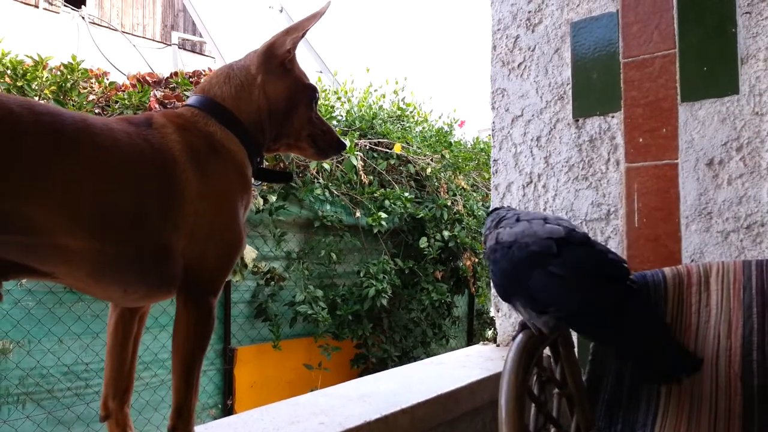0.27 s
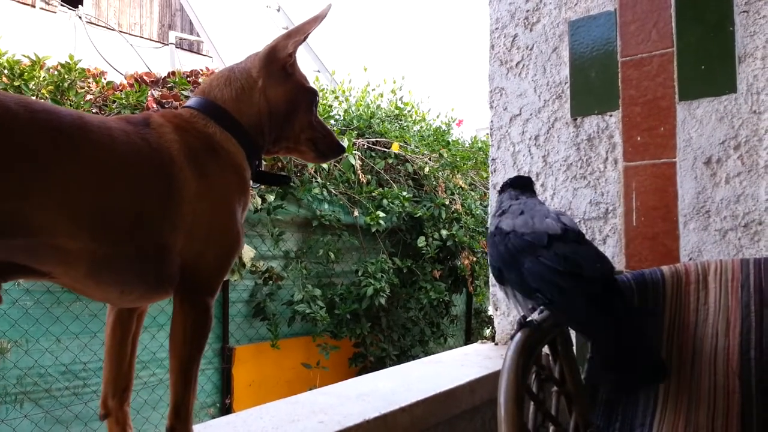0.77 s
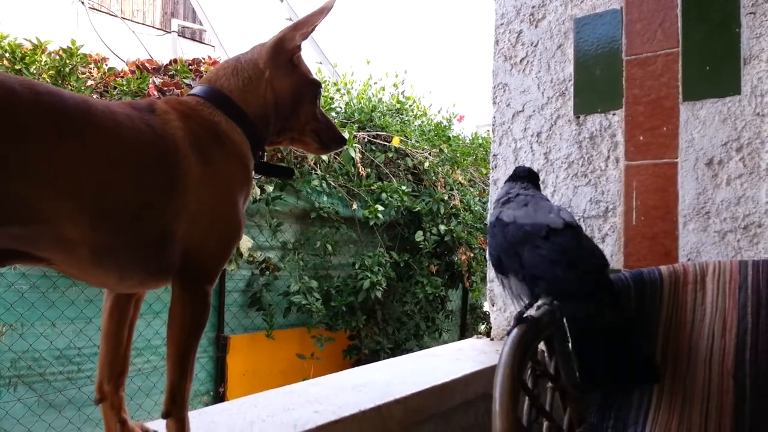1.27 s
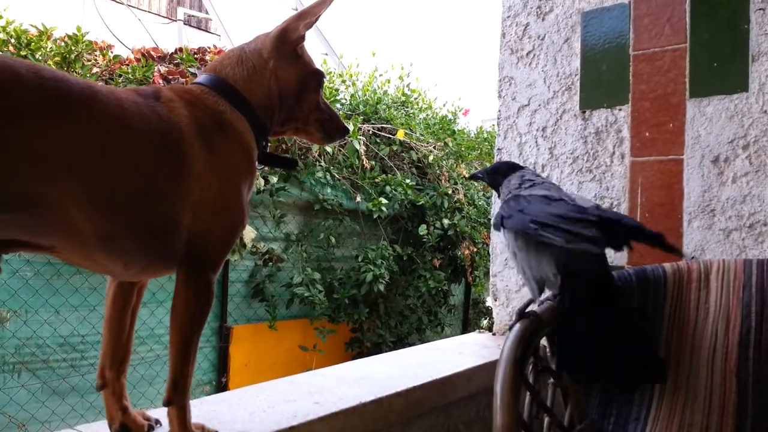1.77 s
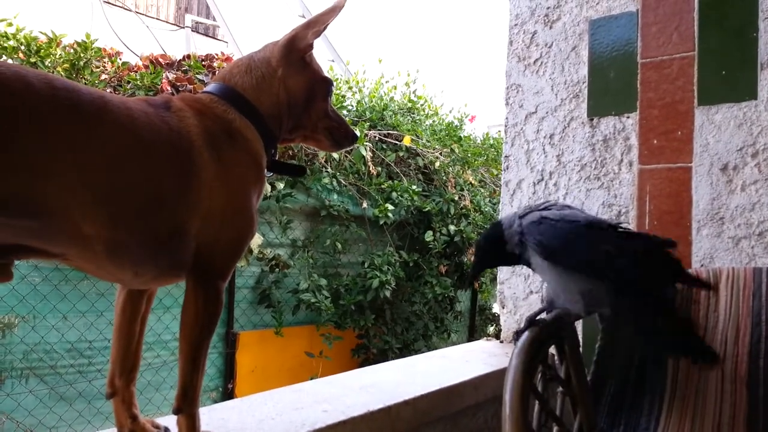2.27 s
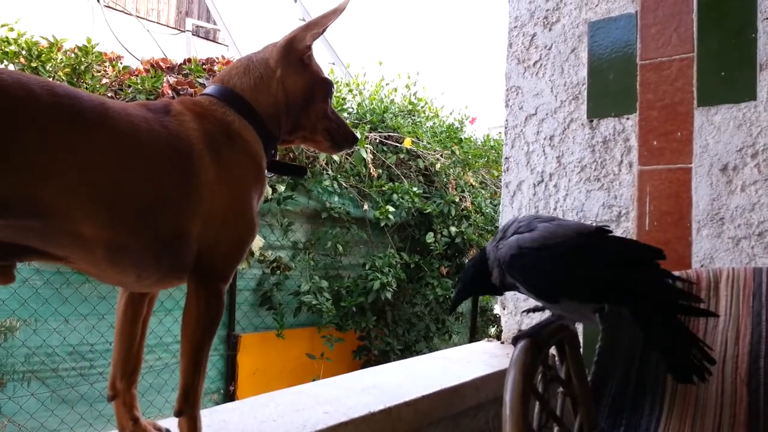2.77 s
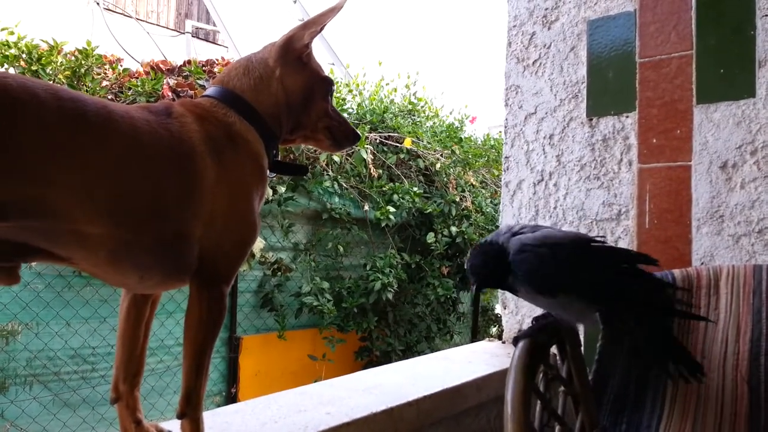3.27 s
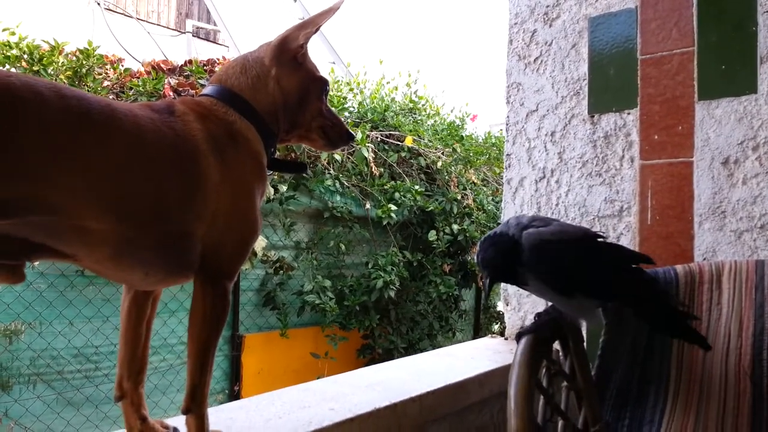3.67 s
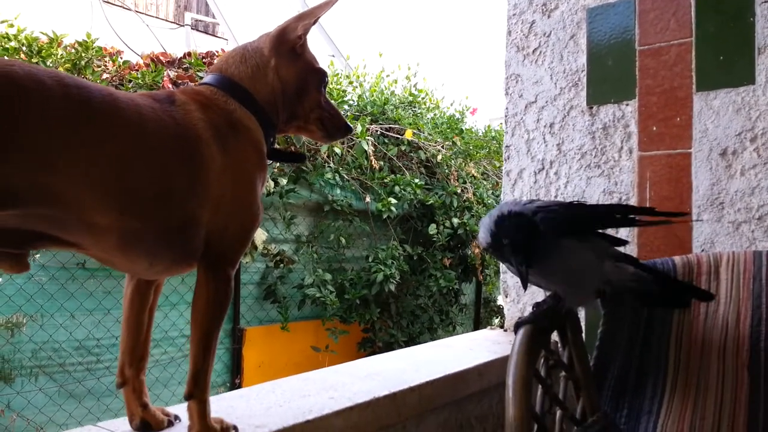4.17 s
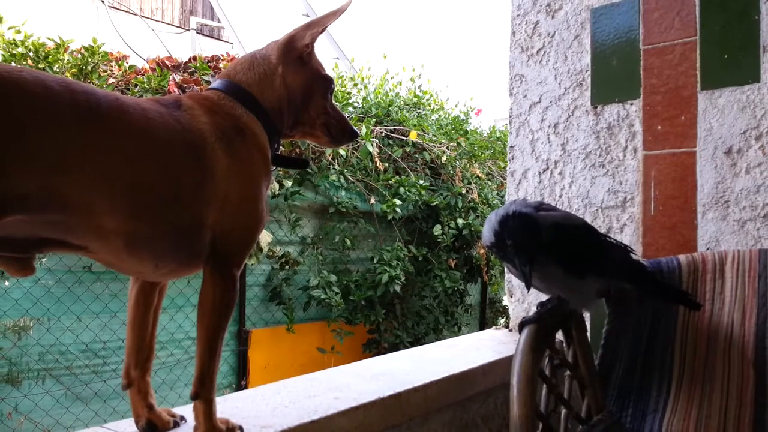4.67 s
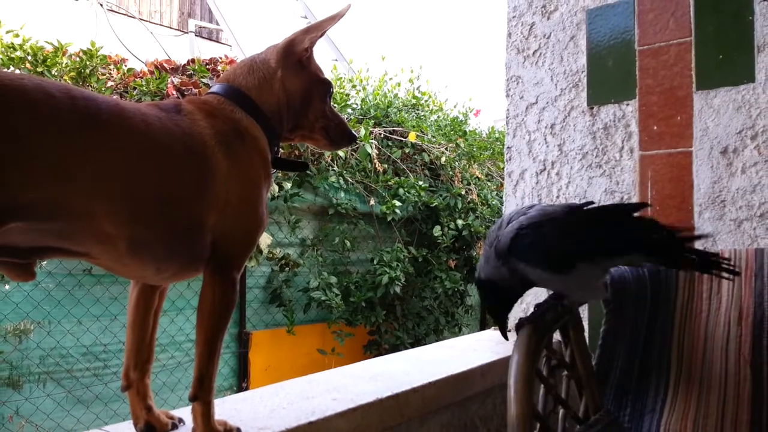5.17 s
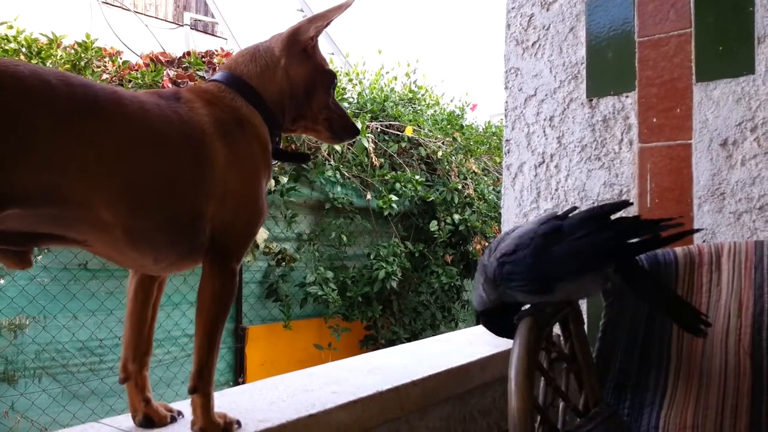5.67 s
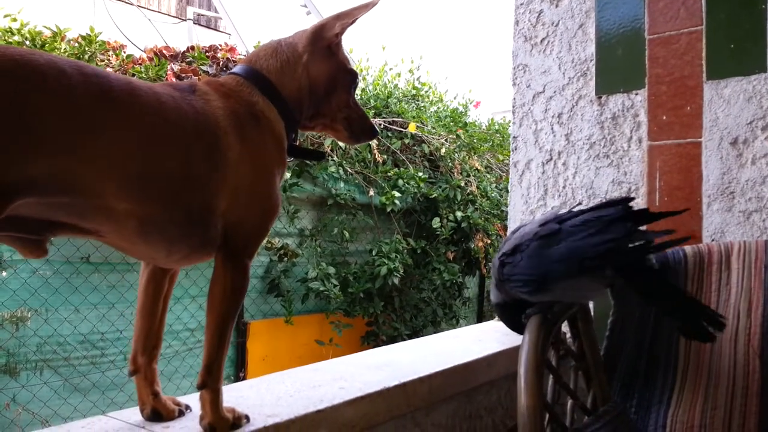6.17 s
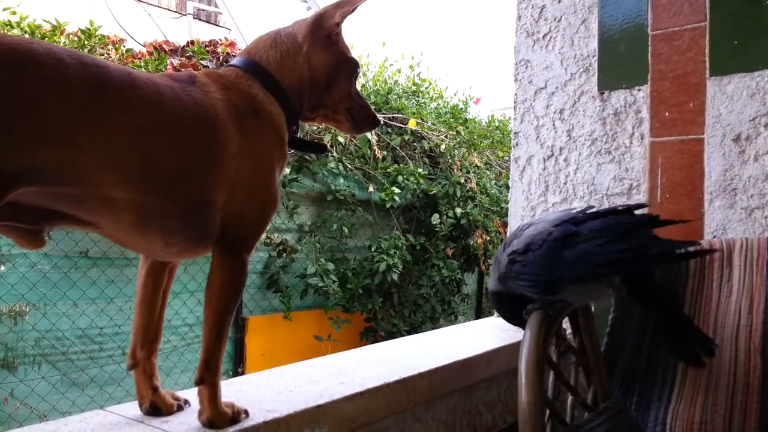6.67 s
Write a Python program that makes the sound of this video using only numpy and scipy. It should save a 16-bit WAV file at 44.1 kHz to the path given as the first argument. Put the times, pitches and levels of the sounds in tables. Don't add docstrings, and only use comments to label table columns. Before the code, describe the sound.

Close stereo sound of a large bird on a woven cane chair: airy feather swishes with small clicks, then bright, brittle cracks as bent canes spring back. After a lull of light ticking, hard beak knocks bounce and rattle the weave, mixed with gritty dragging and a brief taut strand slip. The walls add a very short tail; faint distant town rumble and hiss continue underneath.

```python
import sys
import numpy as np
from scipy import signal
from scipy.fft import rfft, irfft, next_fast_len
from scipy.io import wavfile
from scipy.ndimage import uniform_filter1d

SR = 44100
rng = np.random.default_rng(int(sys.argv[2]) if len(sys.argv) > 2 else 0)


def how_loud(loudness_db):
    steps = np.asarray(loudness_db, float) / 20
    return 10 ** steps


def bounce(signal):
    frames = np.transpose(np.atleast_2d(signal))
    limited = np.clip(frames, -1, 1)
    pcm = np.round(limited * 32767).astype(np.int16)
    wavfile.write(sys.argv[1], SR, pcm)


N = 305613
EDGES_HZ = 25 * 2 ** np.arange(0, 9.6, .5)
LOW_EDGE_HZ, MID_EDGE_HZ, BRIGHT_EDGE_HZ = 700, 1900, 5700
DELAY_SAMPLES = 64


def rms_one(x):
    return x / np.sqrt(np.mean(np.abs(x) ** 2) + 1e-20)


def fft_hz(size):
    return np.arange(size // 2 + 1) * SR / size


def at_hz(points, hz, column=1):
    points = np.array(points)
    return np.interp(np.log(np.maximum(hz, 1)), np.log(points[:, 0]), points[:, column])


def band(x, low_hz, high_hz):
    return signal.sosfilt(signal.butter(2, [low_hz, high_hz], "band", fs=SR, output="sos"), x)


def drift(rate):
    step = 40
    r = np.exp(-2 * np.pi * step * rate / SR)
    white = rng.standard_normal(N // step + 2002)
    slow = signal.lfilter([1], [1, -2 * r, r * r], white)[2000:]
    return np.interp(np.arange(N) / step, np.arange(len(slow)), rms_one(slow))


def strokes(rows, rise_db_per_s, fall_db_per_s, share_column=None):
    power = np.zeros(N)
    for row in rows:
        s, held, db = row[:3]
        share_db = row[share_column] if share_column else 0
        near = np.arange(max(round((s - .2) * SR), 0), min(round((s + held + .8) * SR), N))
        early_s = np.maximum(s - near / SR, 0)
        late_s = np.maximum(near / SR - s - held, 0)
        lost_db = rise_db_per_s * early_s + fall_db_per_s * late_s
        power[near] += how_loud(db + share_db - lost_db) ** 2
    return np.sqrt(power)


def grains(per_s, spread_db):
    sizes = how_loud(spread_db * np.minimum(rng.exponential(1, N), 4)) * rng.choice([-1, 1], N)
    return rms_one(sizes * (rng.random(N) < per_s / SR))


# (time [s], level [dB])
TOWN_SWELL = [(0, -56), (.5, -55.5), (1.3, -57), (2.3, -56.5), (3.2, -57), (4.2, -58), (5.2, -58),
              (6.4, -58.5), (6.93, -56)]
# (frequency [Hz], level per Hz [dB])
BACKGROUND_SPECTRUM = [(15, -47), (25, -26.5), (97, -7.5), (233, -1.5), (305, -5), (330, -5), (479, -6),
                       (592, -12), (659, -7.5), (859, -7), (1150, -10.5), (2010, -14.5), (2180, -14.5),
                       (5530, -20), (14400, -22)]
# (frequency [Hz], likeness [0..1])
SIDE_LIKENESS = [(60, 0.31), (130, 0.75), (290, 0.4), (640, 0.42), (1400, 0.055), (3000, 0.01)]
# (frequency [Hz], left minus right [dB])
SIDE_BALANCE = [(60, -14), (110, 10), (200, 2), (380, -0.5), (700, -2), (1290, -3), (2380, -4), (4400, -5),
                (8120, -4.5), (15000, -3.5)]


def background():
    patchy_db = 0.78
    out, white = 0, rng.standard_normal((2, 2, N))
    s, swell = np.transpose(TOWN_SWELL)
    swell_db = np.interp(np.arange(N) / SR, s, swell - swell.mean())
    for k, (low, high) in enumerate(zip(EDGES_HZ, EDGES_HZ[1:])):
        mid, side = band(white[k % 2], low, high)
        hz = np.sqrt(low * high)
        alike = np.clip(at_hz(SIDE_LIKENESS, hz), 0, 1)
        town = 1 / (1 + (hz / 2500) ** 2)
        tilt = how_loud(at_hz(SIDE_BALANCE, hz) / 2 * np.array([[1], [-1]]))
        gain = how_loud(at_hz(BACKGROUND_SPECTRUM, hz) + town * (swell_db + patchy_db * drift(2.0)))
        pair = np.sqrt(1 + alike) * mid + np.sqrt(1 - alike) * side * [[1], [-1]]
        out = out + gain * tilt * pair
    return how_loud(swell.mean() + 5.5) * rms_one(out)


# (frequency [Hz], decay time T60 [s], level [dB])
BALCONY_DECAY = [(298, 0.12, 1.5), (1350, 0.24, -5), (2920, 0.17, -10), (4600, 0.28, -10.5),
                 (6600, 0.14, -13.5), (9550, 0.37, -11), (14000, 0.3, -10)]


def balcony(x):
    gap_s, scatter_samples = 0.0025, 2.6
    t, tail = np.arange(SR // 2) / SR, 0
    white = rng.standard_normal((2, 2, len(t)))
    for k, (low, high) in enumerate(zip(EDGES_HZ[6:], EDGES_HZ[7:])):
        hz = np.sqrt(low * high)
        t60 = at_hz(BALCONY_DECAY, hz)
        decay = how_loud(at_hz(BALCONY_DECAY, hz, column=2) - 60 * t / t60)
        tail = tail + band(white[k % 2], low, high) * decay / np.sqrt(t60 * SR / 14)
    tail = tail * np.clip(t / gap_s - 1, 0, 1) * how_loud([[-4.0], [0]])
    blurred_time = np.arange(N) + scatter_samples * drift(250)
    scattered = np.interp(blurred_time, np.arange(N), x[1])
    return signal.fftconvolve(scattered[None], tail, axes=1)[:, :N]


# (frequency [Hz], left minus right [dB])
LEFT_SHADOW = [(200, -6), (500, 2.5), (1200, -7), (2700, -9.5), (4200, -15), (6400, -9.5), (10000, -6),
               (15000, 0)]


def ports(size):
    lead_samples, turn_rad, turn_max_rad = 5.84, -1.44, 7.8
    hz = fft_hz(size)
    turn = 2 * np.pi * hz * lead_samples / SR + turn_rad * (1 - np.exp(-hz / 1000))
    left = how_loud(at_hz(LEFT_SHADOW, hz)) * np.exp(1j * np.minimum(turn, turn_max_rad))
    delayed = np.exp(-2j * np.pi * hz * DELAY_SAMPLES / SR)
    return np.array([left, np.ones_like(hz)]) * delayed


# (fully spread [s], held [s], level [dB], settling below the flick [dB])
WING_FLICKS = [
    (.07, 0.0043, -53.5, -25),
    (.16, 0.024, -53.5, -15),
    (.495, 0.083, -42, -7),
    (1.064, .11, -47.5, -6),
    (1.642, 0.057, -47, -8),
    (1.724, 0.0064, -41, -9.5),
    (2.11, 0.06, -48, -6.5),
    (3.275, 0.061, -51, -4.5),
    (4.0, 0.077, -51, -2),
    (4.13, 0.086, -53.5, -17),
]
# (time [s], held [s], level [dB])
CANE_BRUSHES = [
    (2.412, 0.02, -46.5),
    (2.495, .004, -51),
    (2.872, .004, -45.5),
    (2.89, .012, -51),
    (2.908, .001, -33),
    (2.918, 0.0039, -28),
]
# (frequency [Hz], level per Hz [dB])
FEATHER_SPECTRUM = [(900, -13), (1800, -4.5), (2600, -4), (4500, -2.5), (6000, -5.5), (9000, -10),
                    (11500, -14), (15000, -28)]


def feathers():
    size = next_fast_len(N)
    flicking = strokes(WING_FLICKS, rise_db_per_s=446, fall_db_per_s=352)
    brushing = strokes(CANE_BRUSHES, rise_db_per_s=2490, fall_db_per_s=1796)
    settling = strokes(WING_FLICKS, rise_db_per_s=446, fall_db_per_s=42, share_column=3)
    pressure = np.maximum(flicking + brushing, settling)
    barbs = np.array([grains(9000, spread_db=-2.0) for side in "LR"])
    rub = barbs * pressure * how_loud(0.49 * drift(38))
    colour = rms_one(how_loud(at_hz(FEATHER_SPECTRUM, fft_hz(size))))
    return irfft(rfft(rub, size) * colour * ports(size), size)[:, :N]


def resonances(modes, size):
    hz, width, level_db = np.transpose(modes)[:, :, None]
    grid_hz = fft_hz(size)
    r, w = np.exp(-np.pi * width / SR), 2 * np.pi * hz / SR
    z = np.exp(-2j * np.pi * grid_hz / SR)
    frame_cut, cane_cut = [
        signal.sosfreqz(signal.butter(6, cut_hz, "high", fs=SR, output="sos"), grid_hz, fs=SR)[1]
        for cut_hz in (326, 1020)]
    soft = 1 / (1 + 1j * grid_hz / 500) ** 2
    radiated = np.where(hz < LOW_EDGE_HZ, frame_cut * soft, cane_cut)
    return how_loud(level_db) * radiated * np.sin(w) * z / (1 - 2 * r * np.cos(w) * z + r * r * z * z)


def alternate(count):
    return (-1) ** np.arange(count)


def part_db(modes, thud_db, low_db, bright_db):
    hz = np.array(modes)[:, 0]
    parts = [hz < LOW_EDGE_HZ, hz < MID_EDGE_HZ, hz > BRIGHT_EDGE_HZ]
    return np.select(parts, [thud_db, low_db, bright_db], 0.)


def blows(events, modes, rattle_db, rattle_s, struck_db, side_db, frame_db, frame_follows):
    size = 3072
    hardness, crack_edge_hz = 0.23, 11000
    out, t = np.zeros((2, N + size)), np.arange(size) / SR
    shapes, facing = resonances(modes, size), ports(size)
    hz = np.array(modes)[:, 0]
    energy = np.sum(np.abs(shapes) ** 2, axis=1, keepdims=True)
    for s, peak_db, low_db, bright_db, struck_hz in events:
        thud_db = frame_db + (frame_follows - 1) * (peak_db + 29)
        chatter = how_loud(-60 * t / rattle_s) * rng.laplace(0, 1, (len(modes), size))
        rattle = shapes * rfft(chatter, axis=1)
        rattle = rattle * np.sqrt(energy / np.sum(np.abs(rattle) ** 2, axis=1, keepdims=True))
        rattle = rattle / (1 + (hz[:, None] / 6000) ** 3)
        struck = struck_db * np.exp(-(np.log2(hz / struck_hz) / 0.067) ** 2)
        askew = side_db * rng.standard_normal(len(modes)) * [[1], [0]]
        crack = hardness * (peak_db + 15.5) * (hz > crack_edge_hz)
        gains = how_loud(part_db(modes, thud_db, low_db, bright_db) + struck + askew + crack)
        gains = gains * alternate(len(modes))
        sound = irfft(gains @ (shapes + how_loud(rattle_db) * rattle) * facing, size)
        at = round(s * SR) - DELAY_SAMPLES + 10
        out[:, at:at + size] += how_loud(peak_db) * sound / np.abs(sound[1]).max()
    return out[:, :N]


# (frequency [Hz], width [Hz], level [dB])
GRIP_MODES = [(333, 250, 12.5), (1125, 105, -19.5), (1480, 140, -10), (1866, 450, -6), (2270, 190, -33.5),
              (2610, 790, -4), (3110, 102, -10.5), (3480, 330, -5.5), (4200, 160, -3), (4450, 490, -4),
              (5000, 630, 5.5), (5050, 330, 0.5), (6010, 560, 10.5), (6450, 8000, 10), (7280, 400, 4.5),
              (10370, 1130, 0.5), (11700, 1900, -3)]
# (time [s], peak [dB], low canes [dB], bright tick [dB], cane struck [Hz])
CLAW_TICKS = [(0.1574, -41, 3, -16, 4560), (0.4948, -31.5, -5, -11, 4330), (0.5086, -44, -5, -15, 2850),
              (0.5326, -23.5, -17, -28, 3450), (0.5419, -26.5, -20, -12, 3130),
              (0.5651, -20.5, -33, -7, 3140), (0.567, -20, -35, -12, 4800), (1.7245, -32, -27, -22, 4200),
              (1.1595, -48, -2, -17, 2950), (2.212, -38.5, -22, -18, 4440), (2.2225, -32, -25, -7, 4850),
              (2.4057, -28, -6, -14, 4470), (2.7744, -45, -11, -16, 3640), (3.057, -38, -17, -9, 4740),
              (3.1208, -42, -9, -19, 2580), (3.2675, -40, -17, -19, 4180), (3.318, -40, -14, -12, 4290),
              (5.0193, -39, -20, -20, 3700), (5.0694, -41, -16, -7, 3440), (5.312, -36.5, -23, -4.5, 4030)]


def claw_ticks():
    return how_loud(3.0) * blows(CLAW_TICKS, GRIP_MODES, rattle_db=8.5, rattle_s=0.033, struck_db=4.0,
                            side_db=3.0, frame_db=-20.0, frame_follows=1.0)


# (time [s], peak [dB], low canes [dB], bright tick [dB], cane struck [Hz])
CLAW_SNAPS = [
    (2.4544, -3.5, -3.5, -10, 3220),
    (2.4968, -6, -5, -4.5, 3110),
    (2.888, -13.5, -14, -7, 4120),
    (2.9187, -3.5, -16, -2.5, 3900),
]


def claw_snaps():
    return how_loud(6.0) * blows(CLAW_SNAPS, GRIP_MODES, rattle_db=-2.0, rattle_s=0.037, struck_db=5.5,
                            side_db=-3.0, frame_db=-14.0, frame_follows=0.05)


# (frequency [Hz], width [Hz], level [dB])
RIM_MODES = [(289, 63, 8), (475, 460, 8.5), (750, 140, 12.5), (930, 1380, 0.5), (1210, 53, -8),
             (1570, 194, -1.5), (2000, 690, -6.5), (2300, 630, -14.5), (2580, 154, -9.5), (3110, 244, -7),
             (4060, 500, 1.5), (4020, 590, -1), (4560, 470, 3), (5000, 430, 0), (5430, 430, -6),
             (6830, 510, 4.5), (7000, 4100, -3), (7720, 340, 4.5), (9400, 850, 10.5), (9920, 730, 10.5),
             (13600, 1600, 2)]
# (time [s], peak [dB], low canes [dB], bright tick [dB], cane struck [Hz])
FRAME_THUDS = [
    (2.456, -41.5, -17, -25, 600),
    (4.979, -38, -29, -25, 310),
    (5.60, -45.5, -15, -25, 400),
    (5.87, -35.5, -20, -25, 320),
    (6.06, -38.5, -12, -25, 450),
    (6.515, -32.5, -25, -25, 315),
]


def frame_thuds():
    return blows(FRAME_THUDS, RIM_MODES, rattle_db=9.5, rattle_s=0.033, struck_db=-5.0,
                 side_db=-4.5, frame_db=23.0, frame_follows=0.64)


# (time [s], peak [dB], low canes [dB], bright tick [dB], cane struck [Hz])
CANE_TAPS = [
    (5.657, -34, -5, -23, 3100),
    (5.7165, -29, -4.5, -25, 5000),
    (6.3635, -39, 3, -27, 1560),
]


def cane_taps():
    return blows(CANE_TAPS, RIM_MODES, rattle_db=0.0, rattle_s=0.066, struck_db=7.5,
                 side_db=3.0, frame_db=-25.0, frame_follows=1.0)


# (frequency [Hz], width [Hz], level [dB])
TAUT_MODES = [(1140, 150, -1), (2380, 130, -4), (3030, 160, 0), (4220, 160, -4), (4740, 160, 3),
              (5380, 200, 0), (5650, 200, -6), (8960, 300, -8)]
# (taut [s], held [s], level [dB])
STRAND_PULLS = [
    (5.95, .085, -40),
]


def pull():
    size = next_fast_len(N)
    body = rms_one(alternate(len(TAUT_MODES)) @ resonances(TAUT_MODES, size))
    tension = strokes(STRAND_PULLS, rise_db_per_s=800, fall_db_per_s=900)
    slips = grains(2500, spread_db=2.0) * tension
    return irfft(rfft(slips, size) * body * ports(size), size)[:, :N]


# (frequency [Hz], width [Hz], level [dB])
WEAVE_MODES = [(333, 110, 7.5), (500, 124, 7.5), (714, 200, 21), (1220, 180, 4), (1750, 850, -12),
               (2520, 770, 3.5), (3120, 420, 1), (3620, 290, -3.5), (4200, 330, 0), (4540, 640, 3.5),
               (5420, 440, -1), (6500, 2000, -1.5), (9100, 1300, -6.5), (11800, 3900, -5)]
# (full pressure [s], held [s], level [dB], low canes [dB], bright [dB])
BEAK_DRAGS = [(4.646, 0.016, -45.5, -14, -9), (4.92, 0.21, -58, -27, -3), (5.4, 0.0092, -52, -21, -9.5),
              (5.435, 0.048, -52.5, -10, -6), (5.59, 0.011, -44.5, -9.5, -5), (5.653, .035, -47, -29, -8),
              (5.765, 0.018, -50, -0.5, -3), (5.855, 0.043, -43, -3, -3.5), (5.945, .09, -50, -10, 0),
              (6.07, 0.0042, -43, -6, -8), (6.1, 0.042, -52.5, -3, -6), (6.16, 0.12, -59, -1.5, -7),
              (6.762, 0.017, -49, -4, -3), (6.81, .04, -58, -13, 1)]


def drags():
    size, hz = next_fast_len(N), np.array(WEAVE_MODES)[:, 0]
    shapes, facing = resonances(WEAVE_MODES, size), ports(size)
    shared = grains(2500, spread_db=3.0) * how_loud(2.0 * drift(40))
    heard = np.array([shared + 1.27 * grains(2300, spread_db=-1.5) for side in "LR"])
    low, bright = hz < MID_EDGE_HZ, hz > BRIGHT_EDGE_HZ
    middle = ~low & ~bright
    out = 0
    for chosen, share_column in ((low, 3), (middle, None), (bright, 4)):
        pressure = strokes(BEAK_DRAGS, 716, 396, share_column)
        body = rms_one(alternate(chosen.sum()) @ shapes[chosen])
        out = out + rfft(heard * pressure, size) * body
    return irfft(out * facing, size)[:, :N]


# (time [s], peak [dB], low canes [dB], bright tick [dB], cane struck [Hz])
BEAK_PECKS = [(4.975, -33.5, -14.5, -11, 5400), (5.3862, -29, -10.5, -21, 4400),
              (5.3946, -27, -9, -24, 2000), (5.5759, -20.5, -25, -6.5, 2830),
              (5.6103, -29.5, -8.5, -10, 2820), (5.769, -24, -13.5, -14, 3070),
              (5.7864, -27.5, -6, -5, 2560), (5.8589, -9.5, -16, -0.5, 4420),
              (5.8615, -9.5, -22, -5.5, 4740), (5.8747, -20.5, -7, 1, 3900), (6.0474, -18.5, -29, -8, 4240),
              (6.0584, -19.5, -7, -10, 4270), (6.5056, -12.5, -37, -3, 2800), (6.5091, -11, -16, -23, 3020),
              (6.5141, -11, -10.5, 4, 4620), (6.761, -23.5, -8.5, -6, 4250), (6.7749, -25.5, -12, -7, 3640),
              (6.8296, -23, -12.5, -9, 4820)]


def beak_pecks():
    return how_loud(4.0) * blows(BEAK_PECKS, RIM_MODES, rattle_db=6.0, rattle_s=0.045, struck_db=9.5,
                            side_db=1.5, frame_db=-21.0, frame_follows=0.97)


def scene():
    near = feathers() + claw_ticks() + claw_snaps() + frame_thuds()
    near = near + cane_taps() + pull() + drags() + beak_pecks()
    return near + balcony(near) + background()


def low_pass(x):
    return signal.sosfilt(signal.butter(12, 15890, fs=SR, output="sos"), x)


def record(dry):
    dip_hz, dip_width_hz, dip_share = 6170, 770, 0.21
    top_cut_hz = 14550
    dip = signal.lfilter(*signal.iirpeak(dip_hz, dip_hz / dip_width_hz, SR), dry)
    loud = np.clip(dry - dip_share * dip, -1, 1)
    kept = signal.sosfilt(signal.ellip(10, .3, 70, top_cut_hz, fs=SR, output="sos"), loud)
    top = signal.sosfilt(signal.ellip(6, .3, 50, top_cut_hz, "high", fs=SR, output="sos"), loud)
    cracking = uniform_filter1d(top ** 2, size=128, axis=1) > how_loud(-55) ** 2
    opened = uniform_filter1d(cracking * 1., size=64, axis=1)
    return low_pass(kept + how_loud(-24) * top * opened)


dry = scene()
out = record(dry)
bounce(out)
```